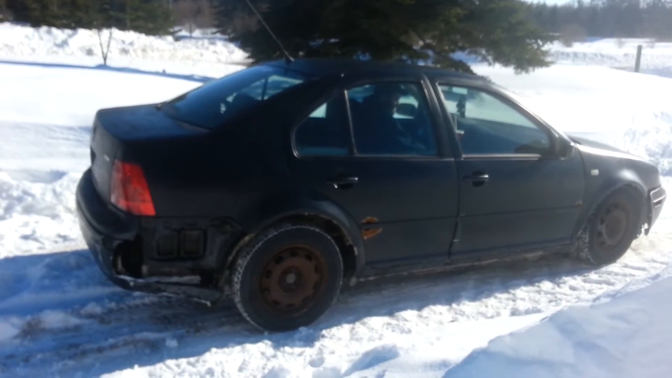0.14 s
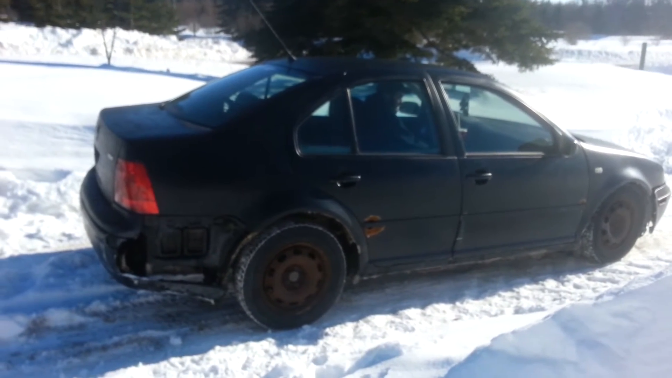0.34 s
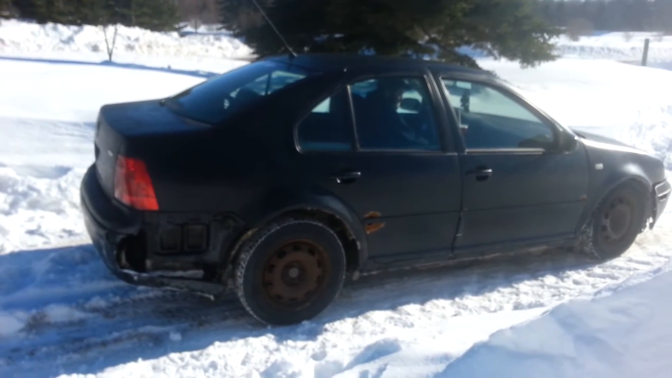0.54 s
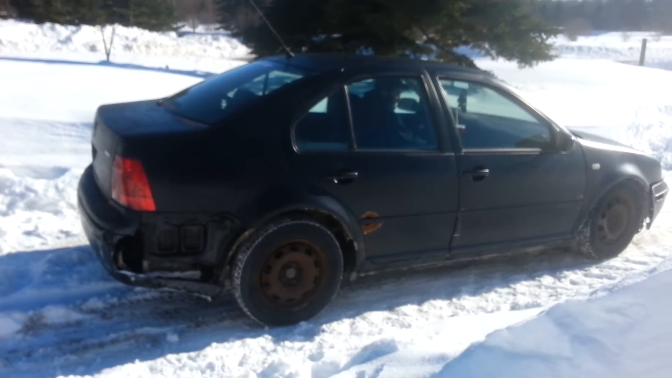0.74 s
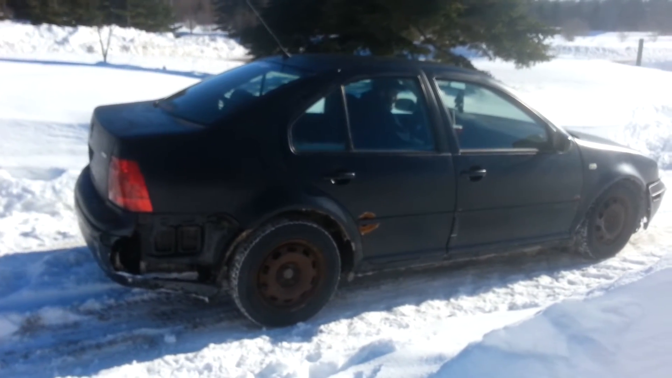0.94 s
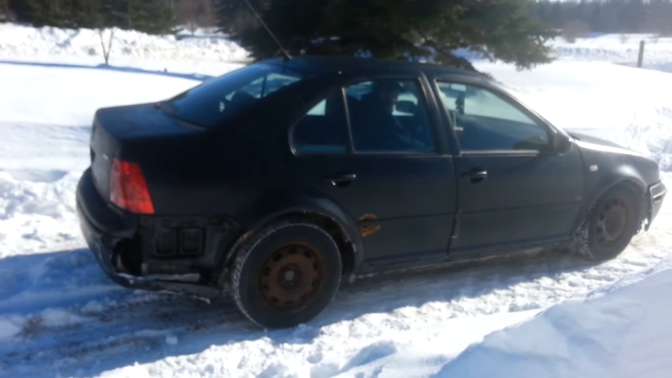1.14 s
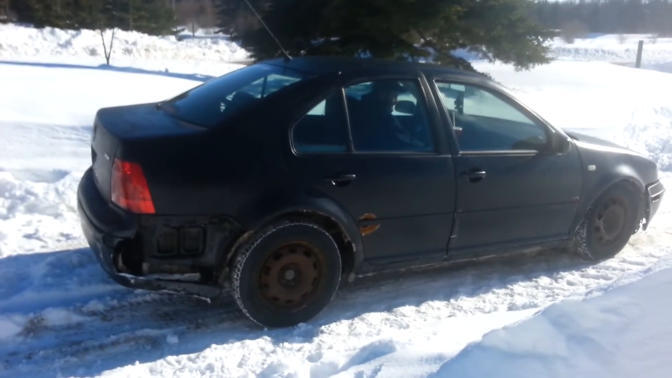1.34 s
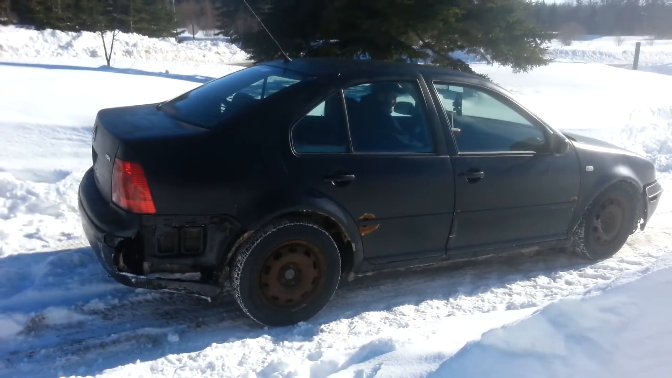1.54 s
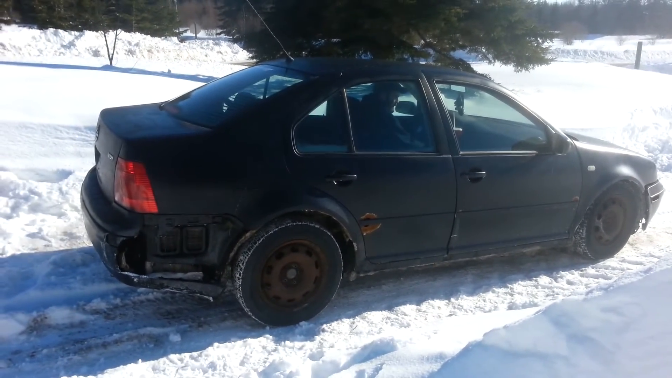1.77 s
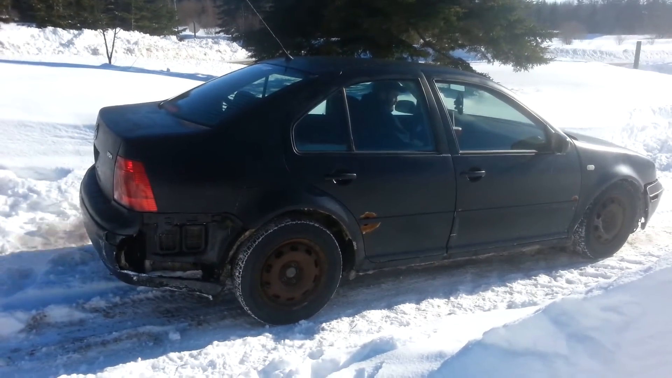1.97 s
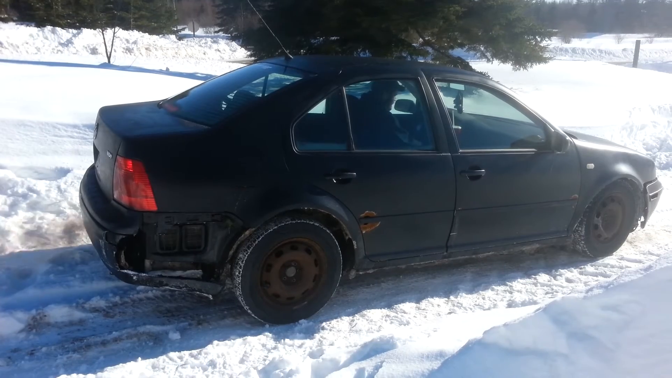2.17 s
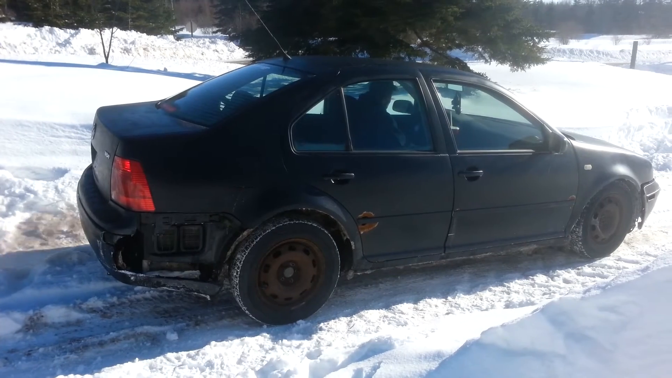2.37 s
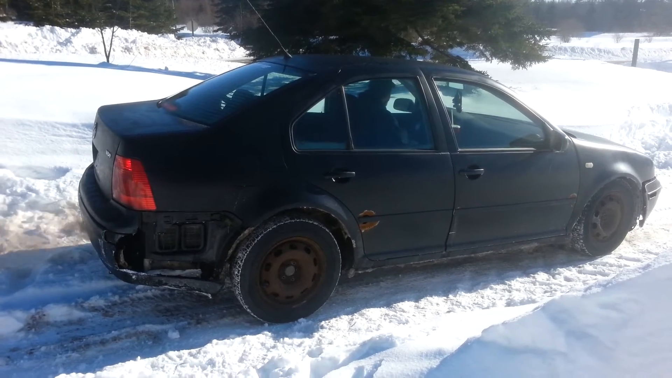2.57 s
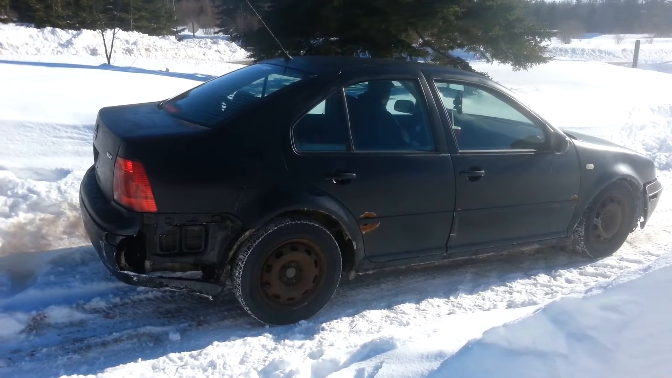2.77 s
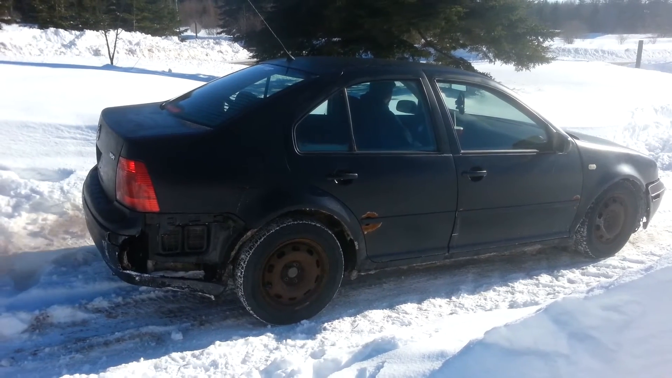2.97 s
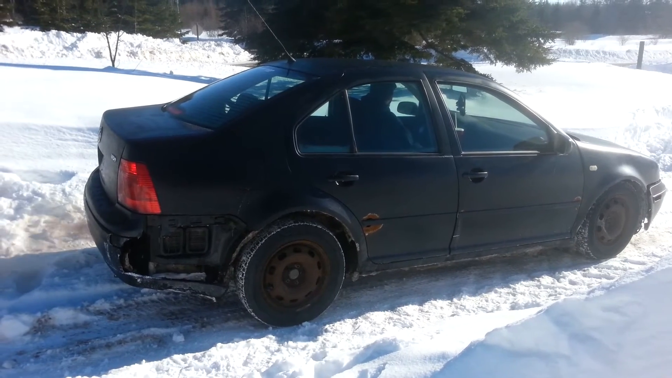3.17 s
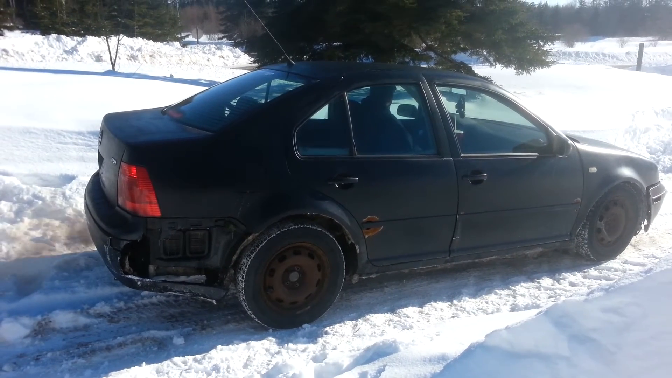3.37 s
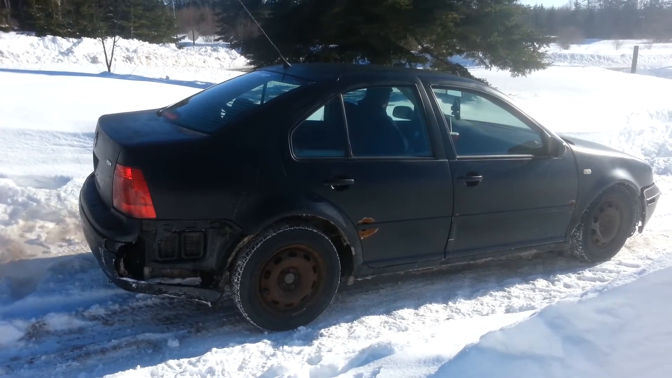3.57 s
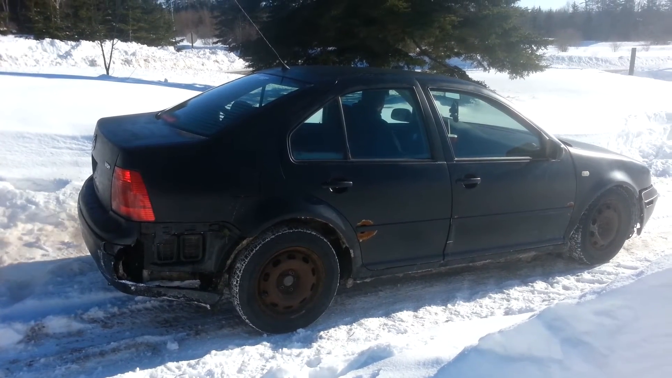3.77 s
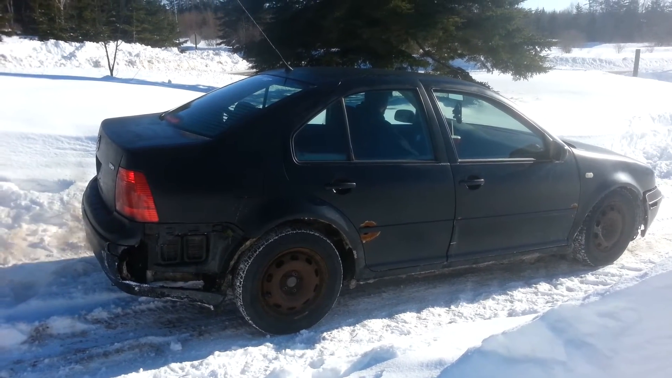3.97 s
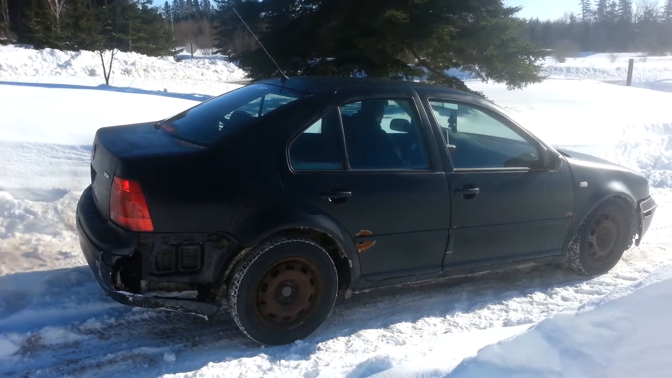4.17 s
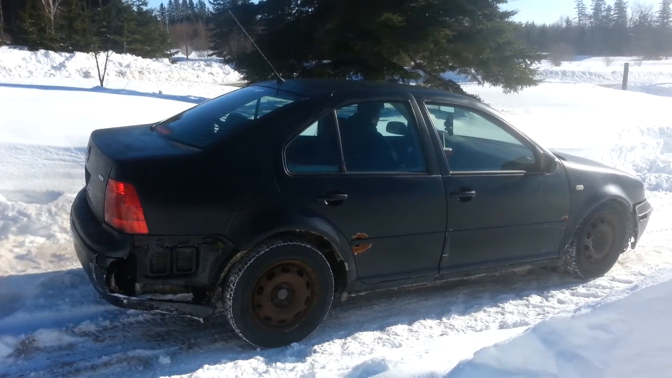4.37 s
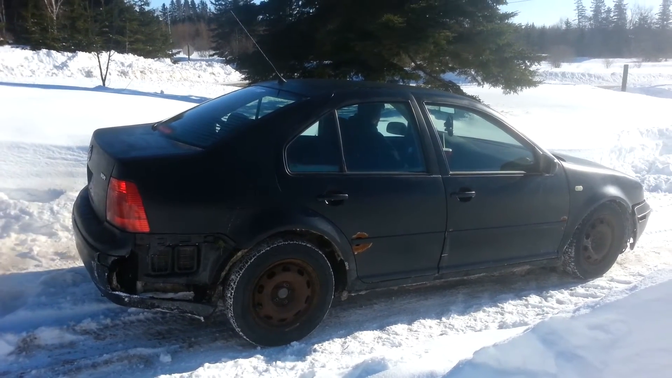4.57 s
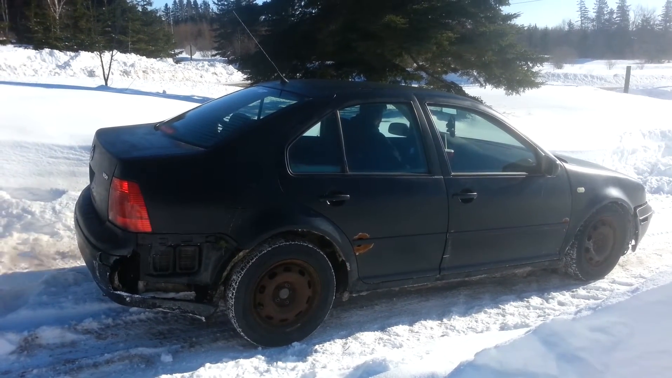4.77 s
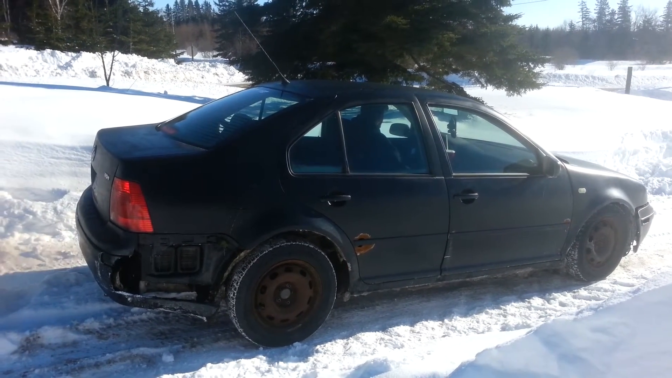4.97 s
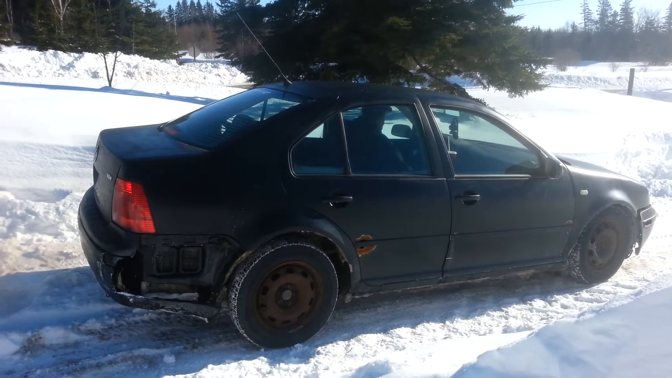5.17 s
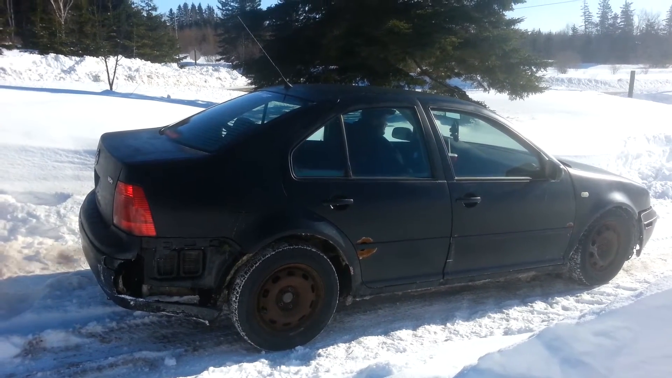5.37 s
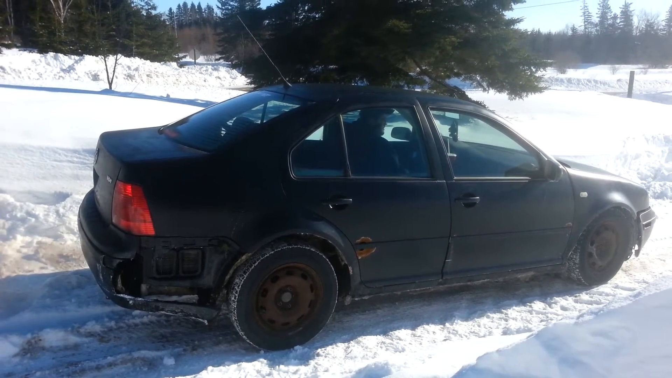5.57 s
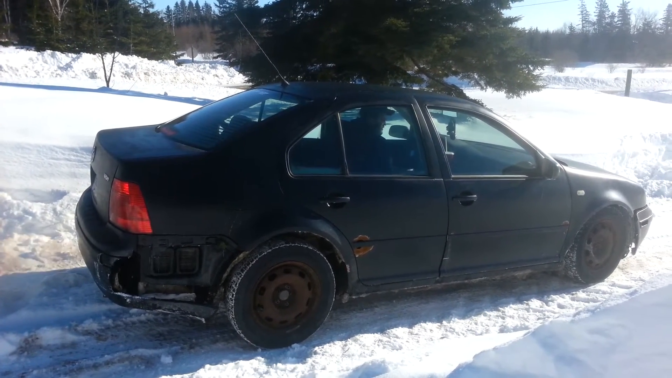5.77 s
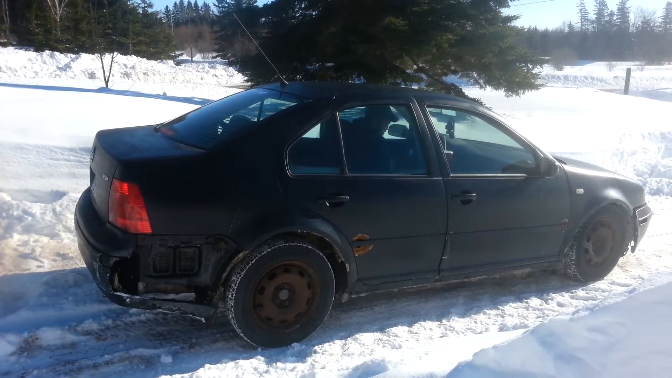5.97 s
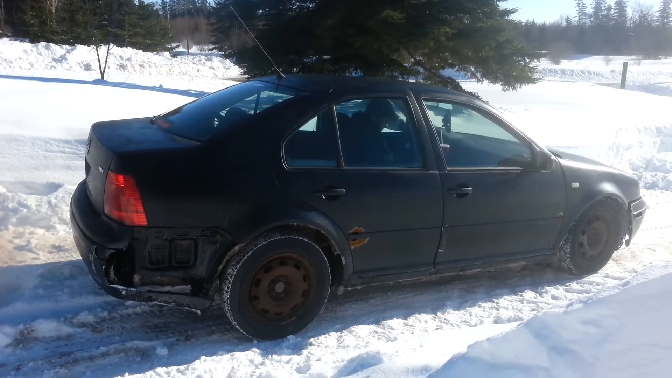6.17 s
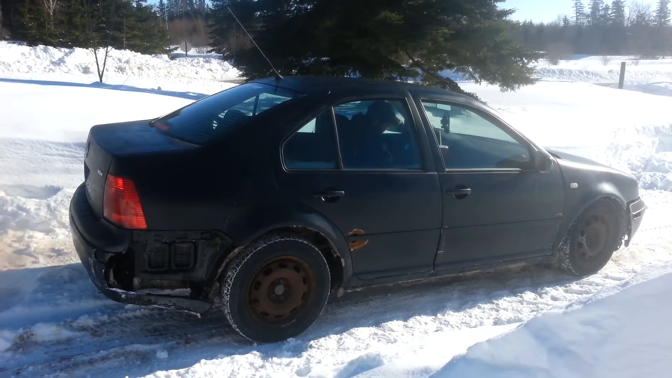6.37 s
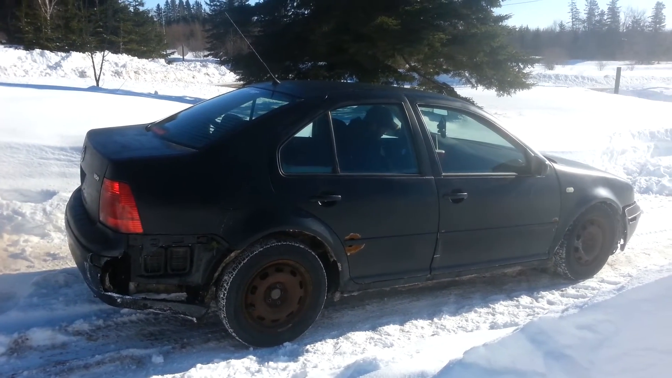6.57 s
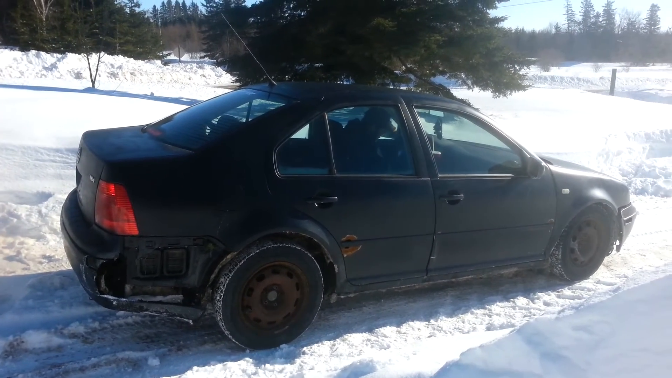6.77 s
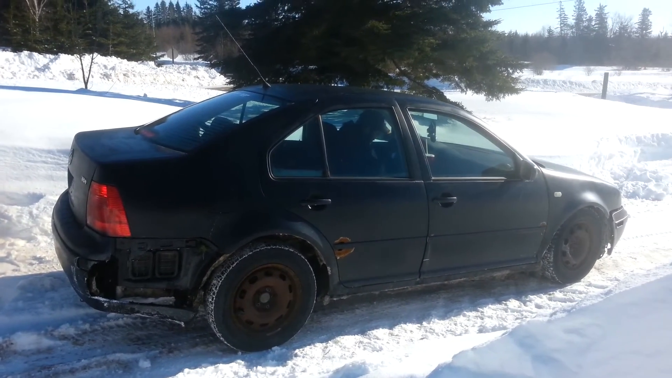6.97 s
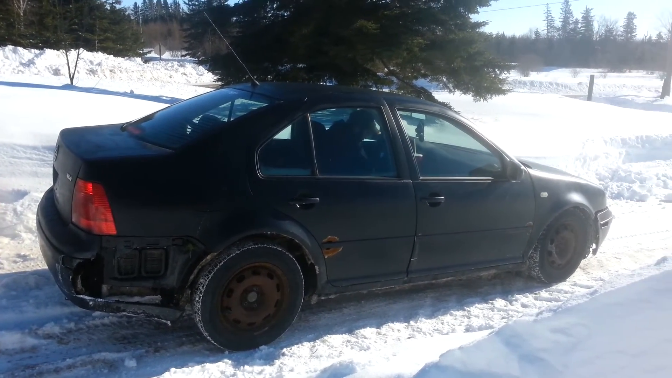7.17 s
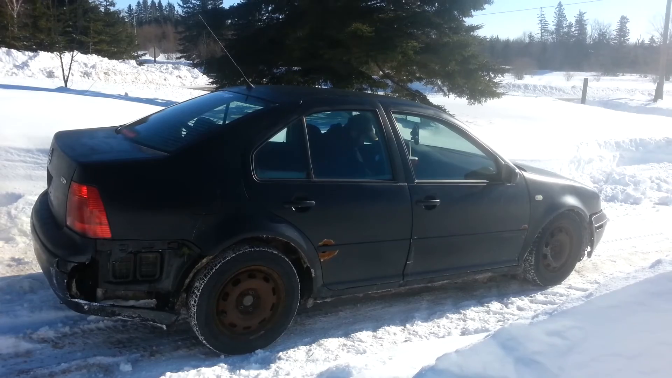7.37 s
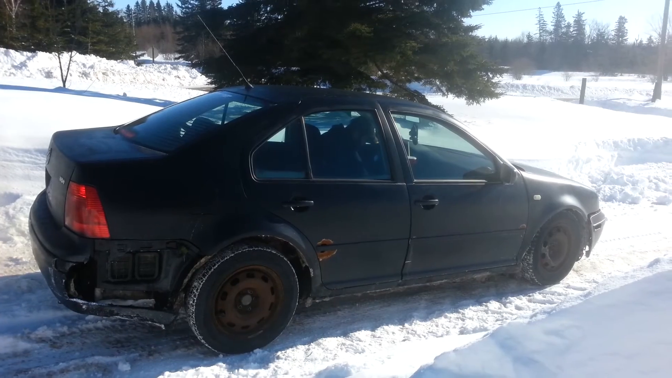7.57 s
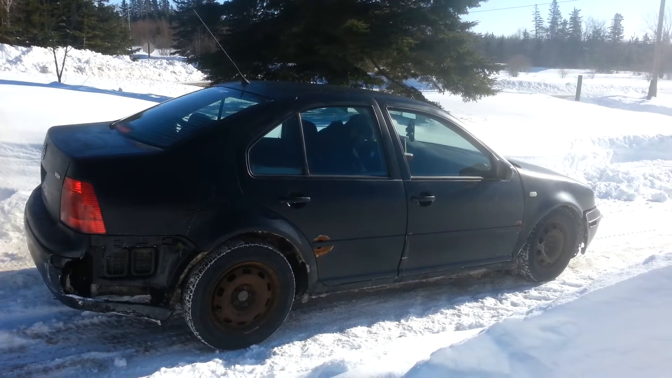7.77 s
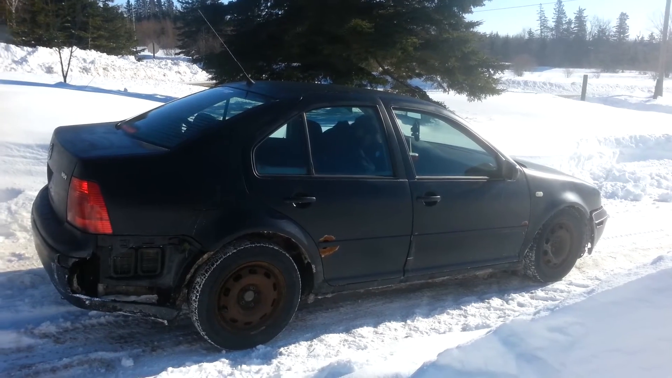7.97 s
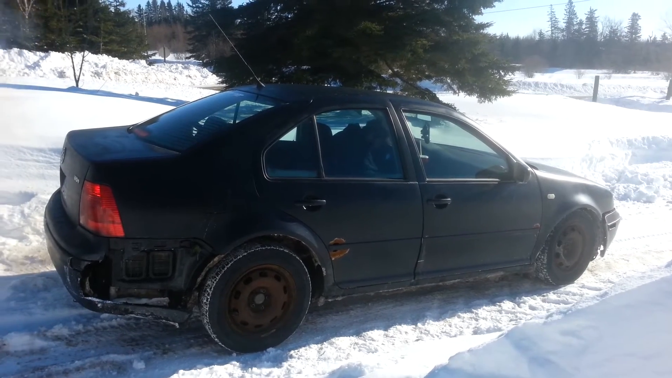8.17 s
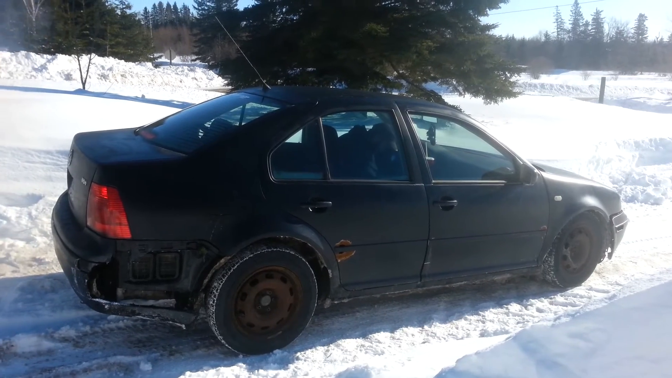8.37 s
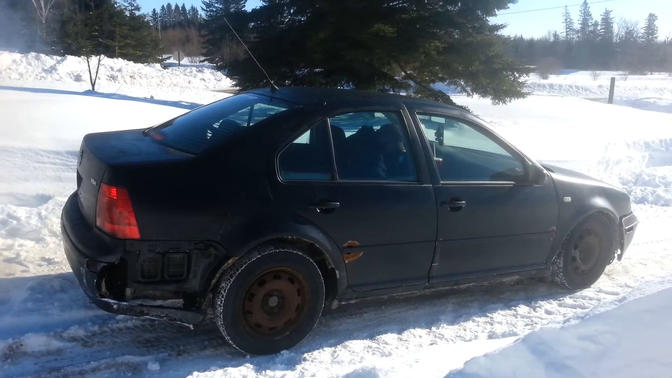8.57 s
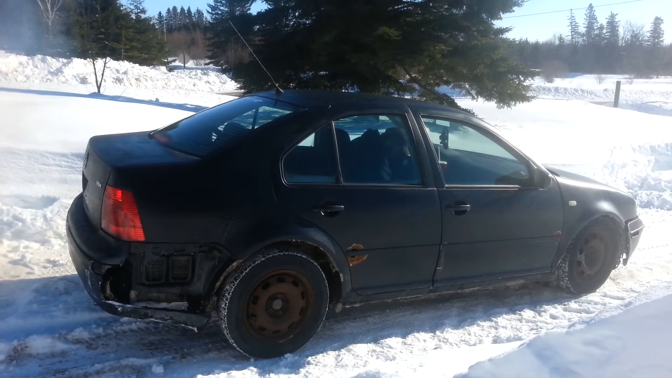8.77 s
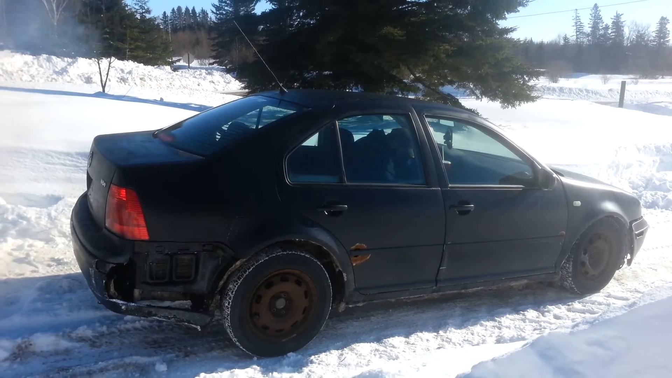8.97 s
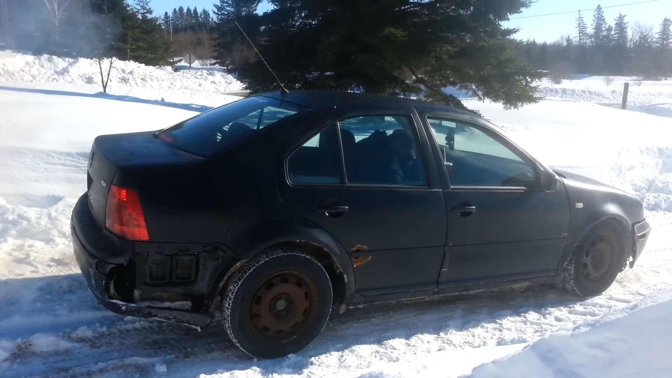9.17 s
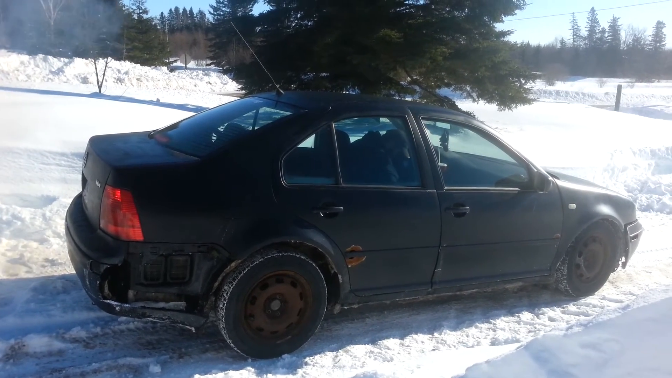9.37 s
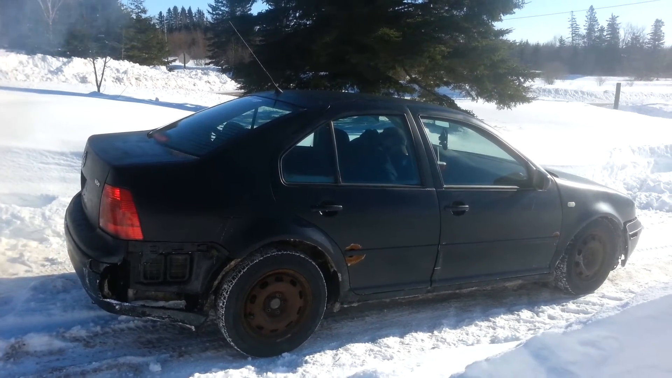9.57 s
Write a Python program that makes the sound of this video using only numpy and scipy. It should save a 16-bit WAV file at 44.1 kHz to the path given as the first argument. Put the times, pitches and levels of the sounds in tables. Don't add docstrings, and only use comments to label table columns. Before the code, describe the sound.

A cold four-cylinder diesel start heard near the exhaust. First comes quiet, low starter groan with gear whine and pulsing compression hiss; then isolated firings, and a sudden much louder stumbling engine. Short rough belt chirps climb and sink amid metallic rattling. Widely spaced hollow barks follow, then come twice as often over a steady clattering idle with rumble and whir. Close outdoor stereo pickup, no echo, barks almost overloading.

```python
import sys
import numpy as np
from scipy import signal
from scipy.fft import rfft, irfft, next_fast_len
from scipy.io import wavfile
from scipy.ndimage import uniform_filter1d, map_coordinates

SR = 44100
rng = np.random.default_rng(int(sys.argv[2]) if len(sys.argv) > 2 else 0)


def generate_wav(sig):
    pcm = np.round(np.clip(np.atleast_2d(sig).T, -1, 1) * 32767).astype(np.int16)
    wavfile.write(sys.argv[1], SR, pcm)


def voltage_ratio(decibels):
    exponent = np.asarray(decibels, float) / 20
    return 10 ** exponent


N = 425124

# t/s, knock level/dB, exhaust thump level/dB
KICKS = [(1.019, -23, -25), (1.077, -19.5, -17), (1.143, -25, -48), (1.218, -19.5, -20), (1.276, -19, -21),
         (1.324, -15.5, -16), (1.362, -12.5, -5.5), (1.399, -12, -18), (1.428, -15.5, -10)]
# cylinder 1 t/s, firing gap/ms, its bark level/dB, knock level/dB of cylinder 2, of cylinder 4
CATCH = [(1.52, 33.5, -43, -11, -8), (1.65, 26, -2, -13, -21), (1.77, 25, -21, -8, -7),
         (1.877, 24, -24, -10, -10), (1.972, 21, -1, -11.5, -23), (2.064, 22, -32.5, -11, -10),
         (2.152, 24.4, -2.5, -45.5, -12), (2.25, 25.5, -22.5, -7, -13), (2.343, 28.5, -36, -12.5, -10.5),
         (2.457, 26.5, -4, -11.5, -10), (2.561, 24, -33.5, -12, -12.5), (2.656, 24.3, -3, -28, -10.5),
         (2.76, 27, -16.5, -14, -11), (2.867, 26, -4, -22, -13.5), (2.973, 25.5, -22.5, -14, -14),
         (3.074, 23.4, -4, -12.5, -16.5), (3.165, 25.5, -39, -15.5, -21.5), (3.264, 25.7, -5.5, -17, -19.5),
         (3.368, 26.2, -6.5, -12, -21.5), (3.483, 27, -24, -10, -9.5), (3.59, 24.3, -4.5, -12.5, -18),
         (3.687, 26, -6.5, -13, -33), (3.793, 28.5, -32, -11.5, -17.5)]
CATCH_THUMP_DB = [1, 4.5, -0.5]
# bark t/s, cylinder 2 knock level/dB after the bark, after the skip
HUNT = [(3.901, -10.5, -16.5), (4.11, -15.5, -10), (4.329, -14, -16), (4.538, -13.5, -17.5),
        (4.75, -18.5, -13), (4.971, -15, -15), (5.189, -14.5, -12), (5.406, -16, -20), (5.6217, -19, -17.5),
        (5.839, -15.5, -16.5), (6.06, -14.5, -18.5)]
COAST_DB = [-0.5, -6.5, -8.5]
RECOVER_DB = [0, -4, -5.5]
# cylinder 1 t/s, its bark level/dB, cylinder 2 knock level/dB
SETTLED = [(6.279, -8, -14), (6.391, -6, -17), (6.4993, -8, -14), (6.609, -7, -16), (6.718, -7, -14.5),
           (6.829, -5, -14.5), (6.936, -29, -18.5), (7.047, -5.5, -14.5), (7.155, -8, -13),
           (7.267, -5.5, -12.5), (7.374, -10, -17.5), (7.482, -7, -14.5), (7.595, -35, -16),
           (7.705, -5, -13.5), (7.811, -10, -18), (7.924, -7, -14), (8.031, -9.5, -17.5), (8.139, -9, -18),
           (8.246, -7, -15), (8.355, -7, -16.5), (8.464, -6, -16), (8.57, -8, -17.5), (8.681, -39, -15),
           (8.792, -6, -18), (8.898, -11, -20), (9.004, -10.5, -19.5), (9.111, -15, -20),
           (9.223, -9.5, -17), (9.33, -9, -16), (9.442, -8, -14.5)]
EVEN_DB = [-0.5, -6, -5.5]
EVEN_RECOVER_DB = [0, -1.5, -3]
SPACING = [.245, .49, .74]
THUMP_DB = [3.5, 4.5, 6.5]
DUDS = [1.728, 2.2, 2.4, 3.447, 3.765, 4.83, 5.05, 7.428, 9.412]
# f/Hz, width/Hz, level/dB
PIPE = [(176, 12, -17), (190.5, 15.3, -0.5), (244.9, 9.8, 7.5), (296.3, 7.7, -4), (355.1, 12.6, -1.5),
        (411, 15.7, -3.5), (497.4, 16, -12), (666, 20.6, -14.5), (997, 30, -18.5), (1207, 50, -13),
        (1690, 440, -22)]
# f/Hz, width/Hz, level/dB
SILENCER = [(66, 34, -5), (115.1, 15.7, 3), (154, 5.6, -8)]
# f/Hz, width/Hz, level/dB
BLOCK = [(720, 268, -0.5), (1010, 320, -4.5), (1191, 230, -1.5), (1645, 430, -4.5), (1924, 200, -6),
         (2198, 230, -8.5), (2732, 326, -6), (3136, 120, -11), (3480, 610, -16.5)]
# f/Hz, level/dB per Hz
FIZZ = [(2060, -34), (3500, -2), (5030, -11), (7240, -13), (9510, -10.5), (14000, -40), (14900, -44)]
# t/s, pitch at rest f/Hz, rise per unit of crank surge f/Hz, slip level/dB
BELT = [(1.93, 479.3, 700, -5), (2.1, 643, 1400, -2.5), (2.3, 701, 800, -3), (2.5, 720, 800, -5),
        (2.65, 881, 499.4, -2), (3.14, 923, 349, -1), (3.2, 791.5, 250, -2), (3.4, 652, 250, -4),
        (4.1, 641, 200, -10.5)]
# t/s, level/dB
CRANK = [(0, -37.5), (.47, -36), (.8, -36.5), (1.1, -35.5), (1.256, -37.5), (1.372, -28.5), (1.6, -28)]
# t/s, hiss level/dB, grind over hiss level/dB
STROKES = [(0.2503, -42, 13), (0.415, -35, -4), (0.5387, -33, -7), (0.6165, -39, 9.5), (0.7093, -39.5, 12),
           (0.8325, -35, -5), (0.9537, -32, 5), (1.0231, -32.5, 0), (1.08, -42, 4), (1.1433, -36, 7.5),
           (1.2246, -30, -2), (1.284, -42, 2)]
# f/Hz, level/dB per Hz
GROAN = [(18, -56), (30, -34), (53, -5), (134, -6.5), (230, 2), (294, -4), (335, 0), (373, -5), (500, -24),
         (650, -43), (1100, -120)]
GEARS = [(260, -34), (450, -4), (1290, -4), (1430, -3.5), (1760, -8), (2060, -1), (2390, -8), (2720, -1.5),
         (3020, -7.5), (4750, -23), (5260, -24.5), (13000, -32), (14900, -37)]
# t/s, level/dB
RUN = [(1.2, -36), (1.39, -33), (1.5, -24), (1.79, -23), (2.66, -24), (3.83, -24.5), (4.49, -24.5),
       (4.94, -26), (5.29, -24.5), (6.11, -29), (6.51, -25.5), (7.8, -26.5), (8.75, -25.5), (9.12, -29.5),
       (9.45, -25), (9.64, -29.5)]
# f/Hz, level/dB per Hz
RUMBLE = [(18, -58), (30, -20), (97, -7), (119, 2), (161, -2.5), (237, -0.5), (297, -14), (377, 4),
          (557, -25), (600, -41), (780, -52), (1320, -120)]
WHIR = [(290, -49), (500, 2.5), (568, -15), (664, -13), (895, -3), (1190, -7.5), (1410, -14.5),
        (1650, -7.5), (2380, -8.5), (2750, -8), (5280, -30.5), (9450, -28.5), (14900, -55)]
# f/Hz, level/dB per Hz
AIR = [(4000, -41), (8000, -5), (10500, -4), (12500, -2), (14800, -5)]
# f/Hz, correlation
ALIKE = [(60, 1), (300, .99), (700, .93), (1400, .62), (2800, .35), (6000, .3), (14000, .2)]
# f/Hz, level/dB
LEAN = [(60, 1.5), (110, 1), (200, 0.0), (370, 2), (690, -1), (1260, 2.0), (2320, 6), (4270, 11), (7850, 2),
        (14400, -3)]
# f/Hz, phase/rad
LEAD = [(60, 0), (600, -.1), (1290, -.3), (1890, -2.4), (2580, -1.6), (3100, -.8), (3620, -1.7),
        (5170, -2.5), (9000, -2.2)]


def firings():
    every = np.vstack([KICKS, catching(), hunting(), settled()])
    every = every[np.argsort(every[:, 0])]
    weak = np.abs(every[:, :1] - DUDS).argmin(axis=0)
    every[weak, 1:] += -12
    return every[every[:, 0] < N / SR].T


def catching():
    s, gap_ms, bark_db, second_db, fourth_db = np.transpose(CATCH)
    at = s[:, None] + gap_ms[:, None] / 1000 * np.arange(4)
    return cycles(at, bark_db, np.linspace(second_db, fourth_db, 3, axis=1), CATCH_THUMP_DB)


def hunting():
    hurry, drag = 0.93, 1.02
    bark_db, skip_db = -5.5, -18
    order = np.arange(4)
    s, coast_db, recover_db = np.transpose(HUNT)[..., None]
    following = np.append(s[1:], SETTLED[0][0])[:, None]
    gap = (following - s) / 8
    rows = len(s)
    after_bark = coast_db + COAST_DB + uneven(rows)
    after_skip = recover_db + RECOVER_DB + uneven(rows)
    barks = cycles(s + hurry * gap * order, np.full(rows, bark_db), after_bark, THUMP_DB)
    skips = cycles(following - drag * gap * (4 - order), np.full(rows, skip_db), after_skip, THUMP_DB)
    return np.vstack([barks, skips])


def settled():
    cycle_s = .109
    closing = np.add(SETTLED[-1], [cycle_s, 1, 0])
    s, bark_db, second_db = np.vstack([SETTLED, closing]).T[..., None]
    length = np.diff(s, axis=0, append=s[-1:] + cycle_s)
    pattern_db = np.where(bark_db > -25, EVEN_DB, EVEN_RECOVER_DB)
    others_db = second_db + pattern_db + uneven(len(s))
    return cycles(s + length * np.append(0, SPACING), bark_db[:, 0], others_db, THUMP_DB)


def uneven(rows):
    return 1.5 * rng.standard_normal((rows, 3)) * [0, 1, 1]


def cycles(s, bark_db, others_db, thump_db):
    lead_db = np.maximum(1.07 * bark_db - 7, 0.38 * bark_db - 16.5)
    soft_db = np.minimum(others_db + thump_db, -8.5)
    knock_db = np.column_stack([lead_db, others_db])
    thumps_db = np.column_stack([bark_db, soft_db])
    return np.column_stack([s.ravel(), knock_db.ravel(), thumps_db.ravel()])


def exhaust(s, thump_db):
    hard = 1 / (1 + np.exp(-(thump_db + 12.0) / 0.64))
    front = s + .0009
    bark_db = 1.453 * thump_db + 5.0 + 20 * np.log10(hard)
    bark = -signal.fftconvolve(pulses(front, bark_db), blow(PIPE, top_hz=2080, low_hz=100))[:N]
    damped = [(hz, 2.2 * width, db - 8) for hz, width, db in PIPE]
    thud_db = thump_db - 2.0 + 20 * np.log10(1 - hard)
    thud = signal.fftconvolve(pulses(front, thud_db), blow(damped, top_hz=886, low_hz=111))[:N]
    boom_db = 0.5 * (thump_db + 13) + 34.0 + rng.normal(0, 1.15, len(s))
    boom = filtered(pulses(s, boom_db), modes(SILENCER))
    boom = filtered(boom, lambda hz: (1j * hz / (70 + 1j * hz)) ** 2)
    gust = gate(s + 0.0026, thump_db - 9.5, rise=0.0029, fall=0.0063)
    puff = diffuse(lambda hz: modes(PIPE)(hz) / (1 + (hz / 1500) ** 4), gust)
    return bark + thud + boom + puff


def blow(table, top_hz, low_hz):
    size = 2 ** 14
    f = np.fft.rfftfreq(size, 1 / SR)
    power = sum(np.abs(modes([mode])(f)) ** 2 for mode in table)
    cepstrum = irfft(np.log(np.sqrt(power) / (1 + (f / top_hz) ** 4) + 1e-6))
    cepstrum[1:size // 2] *= 2
    cepstrum[size // 2 + 1:] = 0
    ring = irfft(np.exp(rfft(cepstrum)) * (1j * f / (low_hz + 1j * f)) ** 2)[:size // 2]
    return ring / np.abs(ring).max()


def knock(s, knock_db):
    scatter = rng.standard_normal((len(s), len(BLOCK), 2))
    rattle = 0
    for k, (hz, width, db) in enumerate(BLOCK):
        at = s + 0.0012 * scatter[:, k, 0]
        hit_db = knock_db + db - 9.5 + 2.36 * scatter[:, k, 1]
        rattle = rattle + diffuse(ringing(hz, width), gate(at, hit_db, rise=0.00093, fall=0.0059))
    fizz_db = 0.82 * knock_db - 32.0 + 2.1 * rng.standard_normal(len(s))
    fizz = diffuse(colour(FIZZ), gate(s - .005, fizz_db, rise=0.0063, fall=0.0075))
    return rattle + fizz


def injectors(s):
    snap_db = -36 + 4 * rng.standard_normal(len(s))
    return diffuse(ringing(3430, 270), gate(s - .002, snap_db, rise=0.00036, fall=0.00051))


def valves(s, knock_db):
    scatter = rng.standard_normal((len(s), 2))
    at = s + 0.0137 + 0.0045 * scatter[:, 0]
    land_db = 0.5 * (knock_db + 12.0) - 36.5 + 4 * scatter[:, 1]
    landing = gate(at, land_db, rise=0.0018, fall=0.0042)
    return diffuse(lambda hz: modes(BLOCK)(hz) / (1 + (hz / 3800) ** 4), landing)


def belt(s, knock_db):
    kept = .55
    surge = signal.lfilter([0, 1 - kept], [1, -kept], voltage_ratio(knock_db))
    slipping = (s > 1.92) & (s < 4.13)
    s, knock_db, surge = s[slipping], knock_db[slipping], surge[slipping]
    at, pitch_hz, surge_hz, slip_db = np.transpose(BELT)
    hz = np.interp(s, at, pitch_hz) + surge * np.interp(s, at, surge_hz)
    hz = hz * (1 + .035 * rng.standard_normal(len(s)))
    db = np.interp(s, at, slip_db) + 0.91 * knock_db
    latest = np.searchsorted(s, np.arange(N) / SR) - 1
    held = hz[np.clip(latest, 0, len(s) - 1)]
    rough = 1 + 0.01684 * wobble(60) + 0.0347 * wobble(300)
    pitch = uniform_filter1d(held, size=200) * rough
    return gate(s, db, rise=0.00097, fall=0.0091) * np.sin(2 * np.pi * np.cumsum(pitch) / SR)


def starter():
    gear_db, = curves(CRANK)
    rest_db = CRANK[0][1]
    groan_db = rest_db - 2 + 1.2 * (gear_db - rest_db)
    groan = voltage_ratio(groan_db + 2.0 * wobble(25.6)) * diffuse(colour(GROAN))
    gears = voltage_ratio(gear_db + 0.88 * wobble(17.2) + 1.15 * wobble(59.3)) * diffuse(colour(GEARS))
    engaged = np.interp(np.arange(N) / SR, [1.3, 1.6], [1, 0])
    s, hiss_db, grind_db = np.transpose(STROKES)
    hiss = diffuse(ringing(3800, 2000), gate(s, hiss_db - 10.5, rise=0.0069, fall=0.014))
    grind = diffuse(ringing(900, 1100), gate(s, hiss_db + grind_db - 8.5, rise=0.0063, fall=0.022))
    return engaged * (groan + gears) + hiss + grind


def running_gear():
    load_db, = curves(RUN)
    running = np.interp(np.arange(N) / SR, [1.3, 1.6], [0, 1])
    rumble = voltage_ratio(load_db - 3.5 + 3.2 * wobble(13)) * diffuse(colour(RUMBLE))
    whir = voltage_ratio(load_db - 8.0 + 1.15 * wobble(14) + 1.7 * wobble(70)) * diffuse(colour(WHIR))
    return running * (rumble + whir)


def microphone_hiss():
    return voltage_ratio(-62.5 + 1.2 * wobble(8)) * diffuse(colour(AIR))


def diffuse(response, envelope=1):
    def shaped(hz):
        turn = np.arccos(np.clip(along(ALIKE, hz), -1, 1)) / 2
        return response(hz) * [np.cos(turn), np.sin(turn)]

    rms = np.sqrt(np.mean(np.abs(response(np.arange(0, SR / 2, 2))) ** 2))
    mid, side = filtered(rng.standard_normal((2, N)) * envelope, shaped) / rms
    return np.array([mid + side, mid - side])


def modes(table):
    def response(f):
        total = 0
        for k, (hz, width, db) in enumerate(table):
            total = total + (-1) ** k * voltage_ratio(db) * 1j * f * width / (hz * hz - f * f + 1j * f * width)
        return total

    return response


def ringing(hz, width):
    return lambda f: modes([(hz, width, 0)])(f) ** 2


def colour(spectrum):
    return lambda hz: voltage_ratio(along(spectrum, hz))


def along(points, hz):
    f, value = np.transpose(points)
    return np.interp(np.log(hz + 1), np.log(f + 1), value)


def filtered(x, response):
    size = next_fast_len(N + SR // 2)
    return irfft(rfft(x, size) * response(np.fft.rfftfreq(size, 1 / SR)), size)[..., :N]


def pulses(s, db):
    at = np.clip(np.round(s * SR).astype(int), 0, N - 1)
    return np.bincount(at, voltage_ratio(db), N)


def gate(s, db, rise, fall):
    t = np.arange(SR // 10) / SR
    shape = (1 - np.exp(-t / rise)) ** 2 * np.exp(-t / fall)
    return np.abs(signal.fftconvolve(pulses(s, db), shape / shape.max())[:N])


def curves(rows):
    s, *columns = np.transpose(rows)
    return [np.interp(np.arange(N) / SR, s, column) for column in columns]


def wobble(rate):
    knots = rng.standard_normal(int(N * rate / SR) + 4)
    return map_coordinates(knots, [np.arange(N) * rate / SR])


def scene():
    s, knock_db, thump_db = firings()
    engine = exhaust(s, thump_db) + knock(s, knock_db) + injectors(s) + valves(s, knock_db)
    return engine + belt(s, knock_db) + starter() + running_gear() + microphone_hiss()


def top_cut(x):
    return signal.sosfilt(signal.butter(12, 15030, fs=SR, output="sos"), x)


def record(dry):
    def port_response(hz):
        facing = voltage_ratio(along(LEAN, hz) / 2) * np.exp(.5j * along(LEAD, hz))
        return np.array([facing, 1 / facing]) * (1j * hz / (30 + 1j * hz)) ** 4

    clipped = np.clip(filtered(dry, port_response), -1, 1)
    mix = filtered(clipped, lambda hz: hz < 14850)
    return top_cut(mix)


dry = scene()
out = record(dry)
generate_wav(out)
```